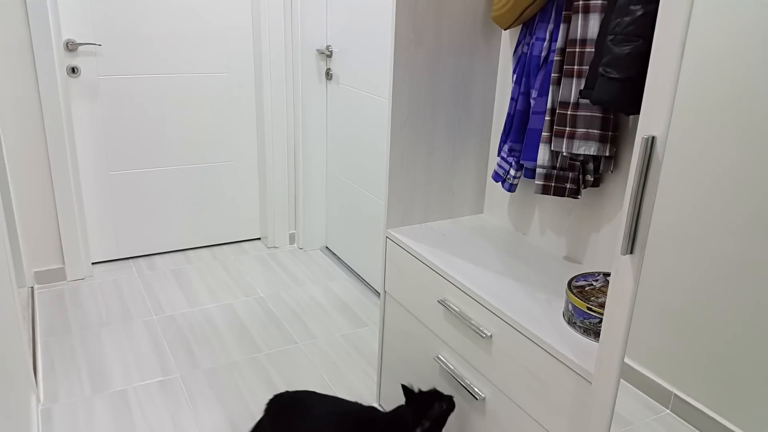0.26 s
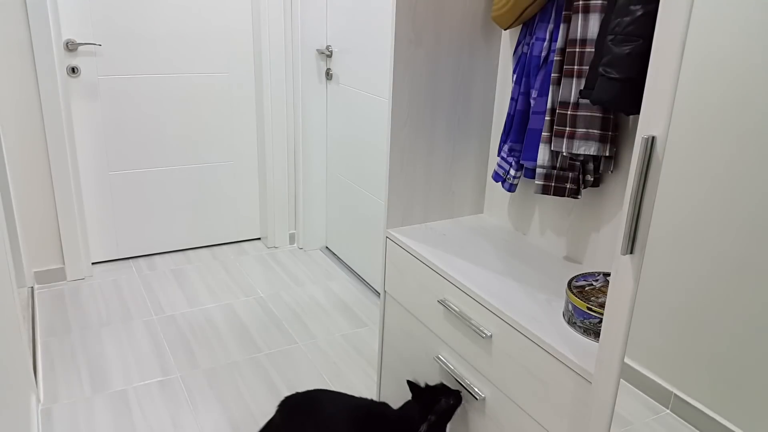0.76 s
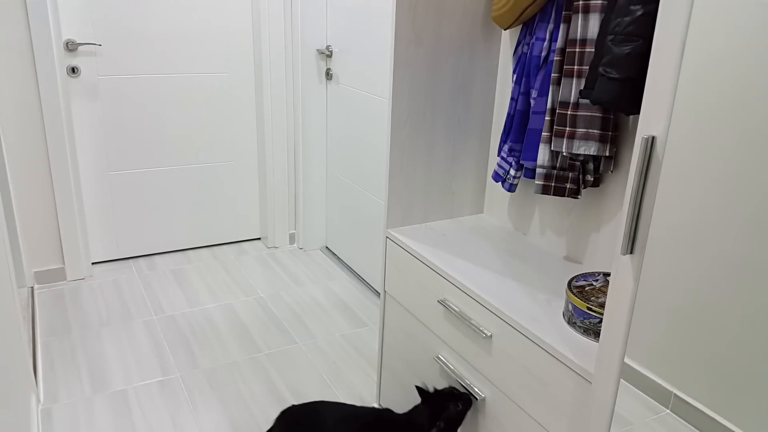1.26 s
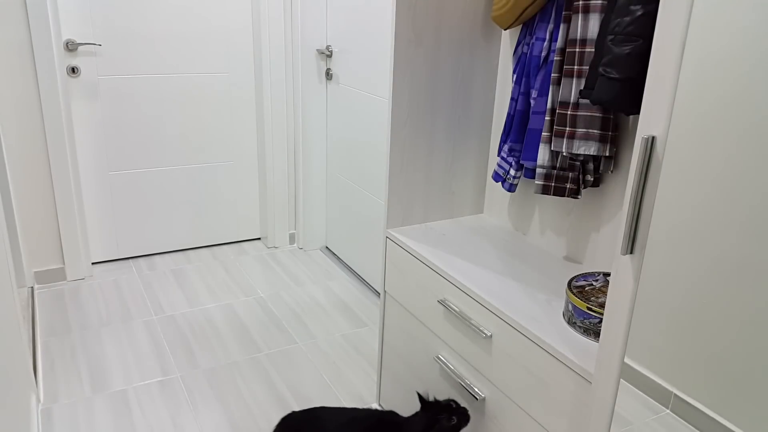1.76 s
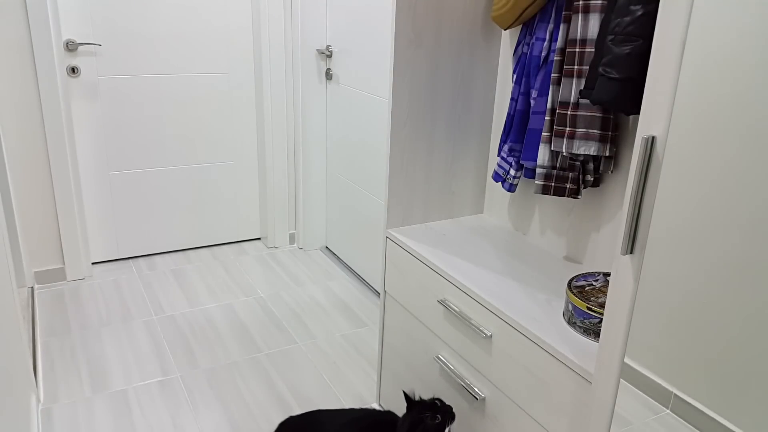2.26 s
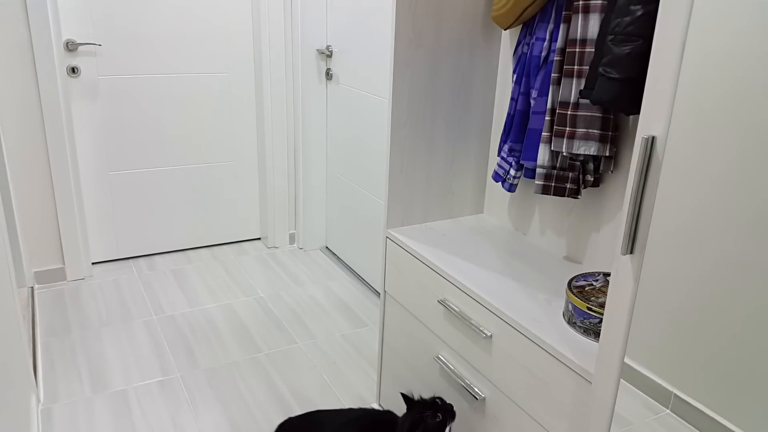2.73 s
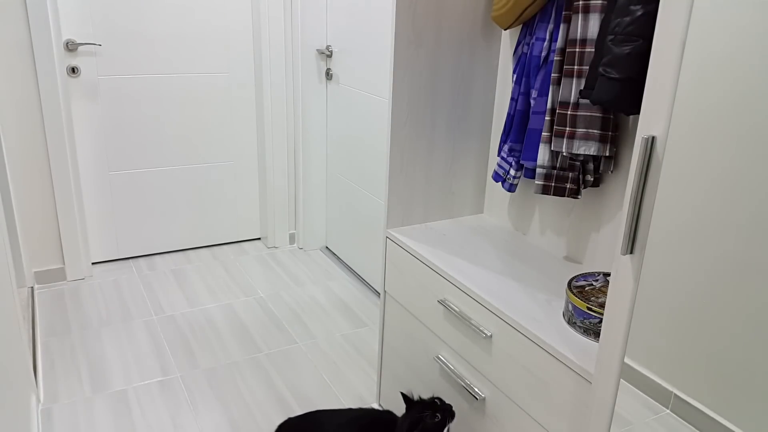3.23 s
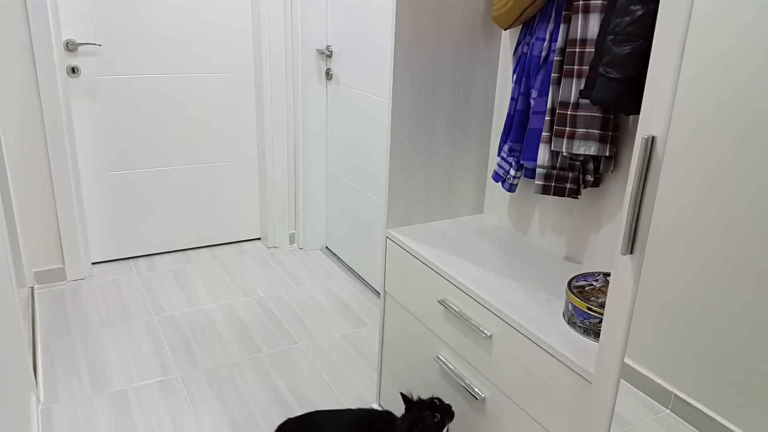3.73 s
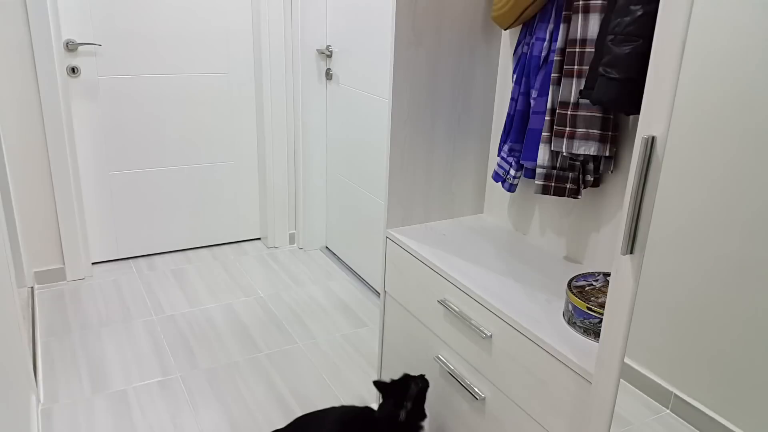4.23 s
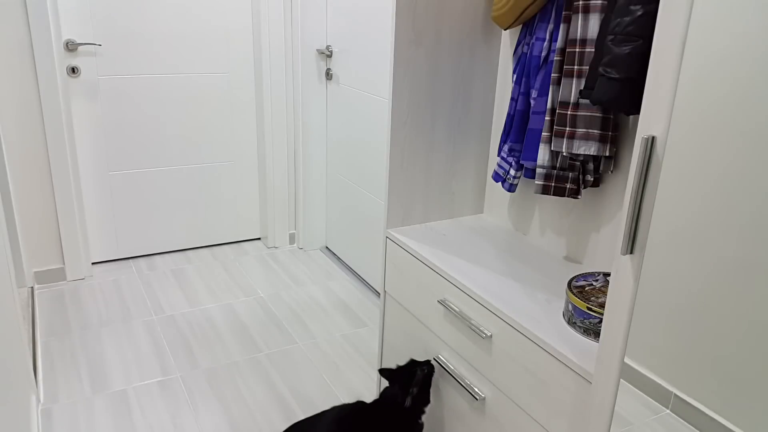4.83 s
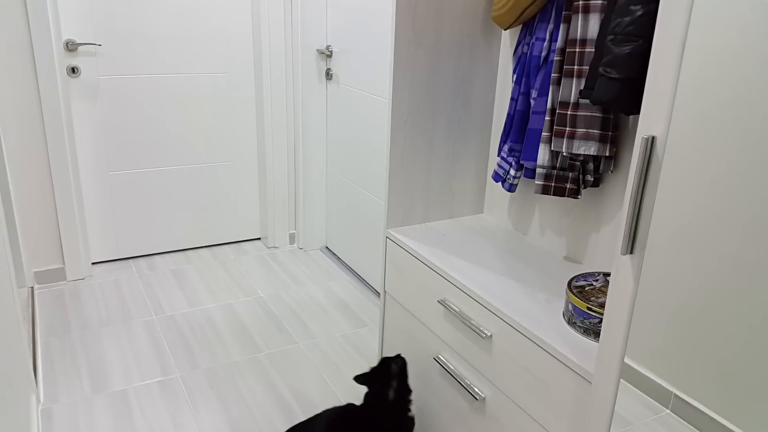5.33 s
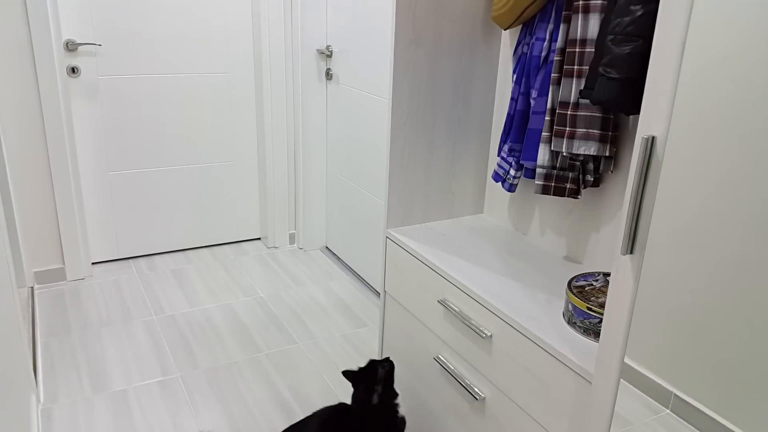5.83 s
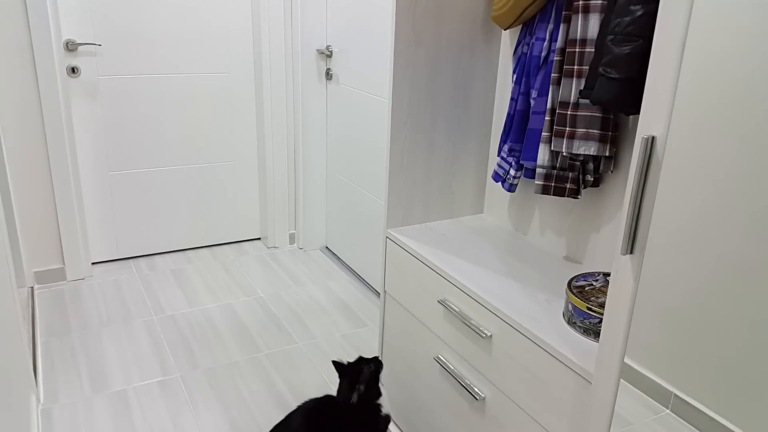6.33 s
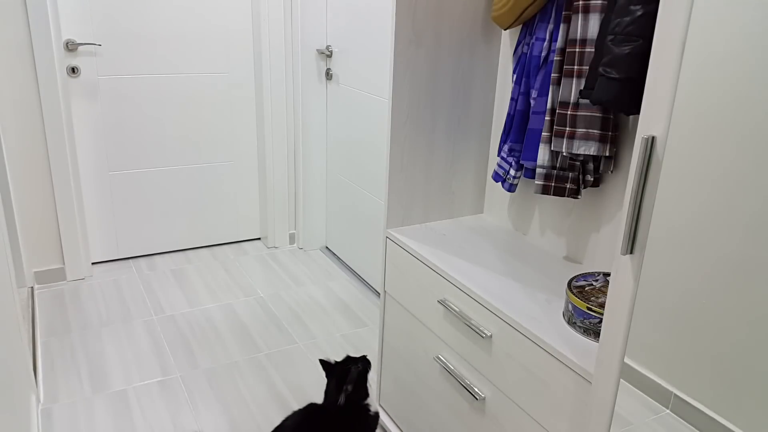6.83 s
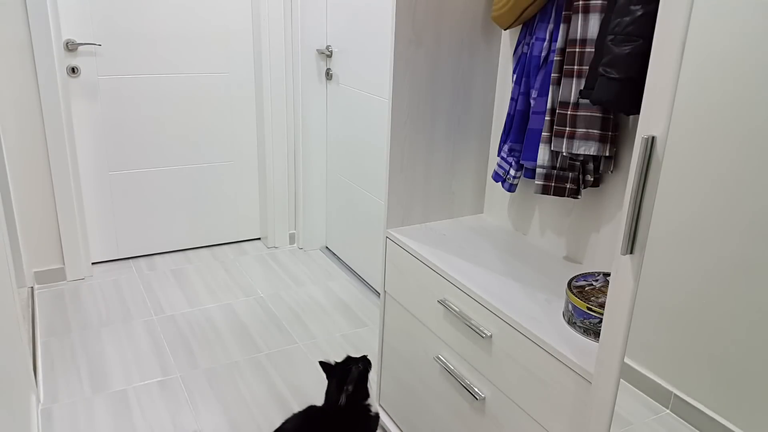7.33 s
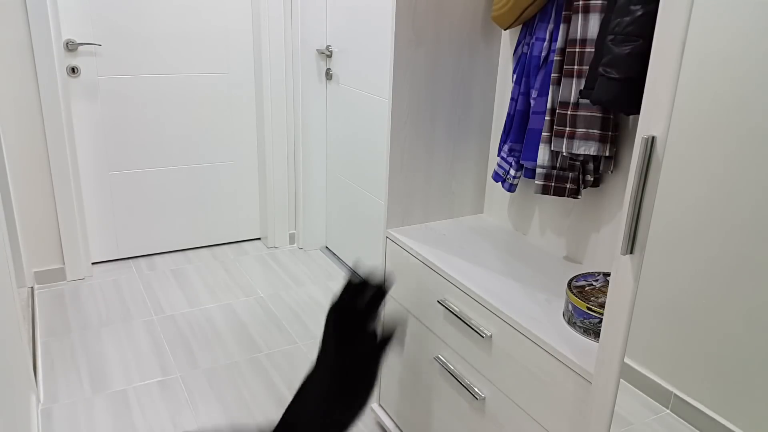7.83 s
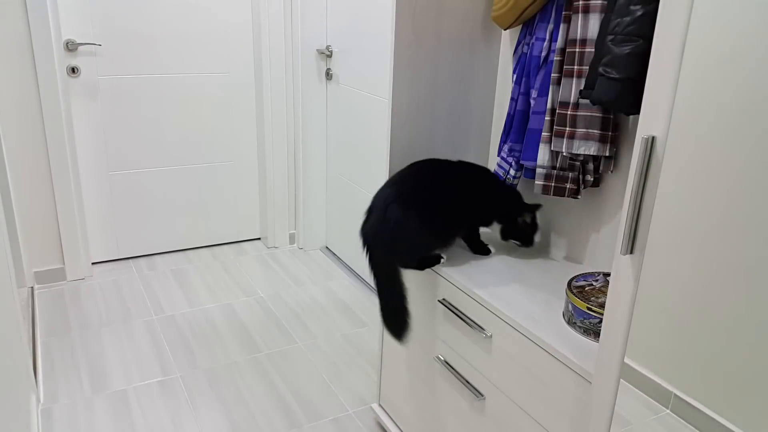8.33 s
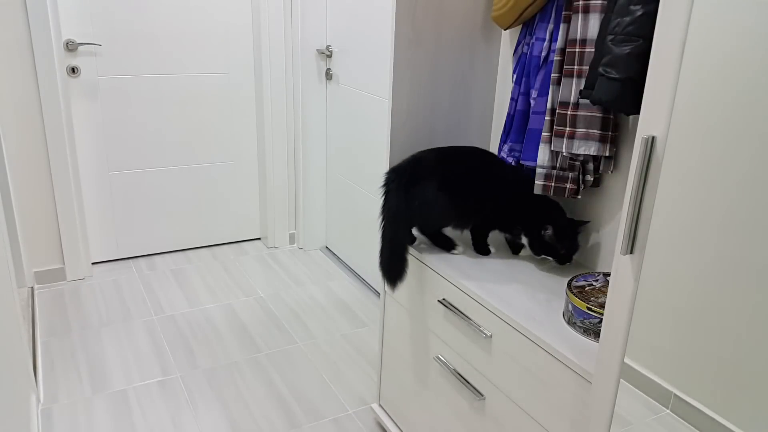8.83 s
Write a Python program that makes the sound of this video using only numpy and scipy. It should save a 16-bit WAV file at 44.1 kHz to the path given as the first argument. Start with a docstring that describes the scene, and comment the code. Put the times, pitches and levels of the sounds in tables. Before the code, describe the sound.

A cat moans long, quavering yowls in a hard, echoing tiled hallway, then thumps softly onto a wooden cabinet and gives one last short call.

```python
"""Cat yowls in a tiled hallway

A cat calls six times and jumps onto a wooden cabinet before the last call. Long yowls start as a quavering,
nearly closed-mouth moan, sink in pitch, open into "ow" and break off in a rasp: summed harmonics and half
harmonics shaped by throat and mouth resonances, with puffs of noise and creaks. Paws boom through panel modes;
ticks are bright noise bursts. Decaying noise makes the hard walls ring over a faint steady hiss.
"""
import sys
import numpy as np
from scipy import signal
from scipy.fft import rfft, irfft
from scipy.io import wavfile

SR = 44100
rng = np.random.default_rng(int(sys.argv[2]) if len(sys.argv) > 2 else 0)


def dump_mix(stems):
    """Bounce the given channels to the path in sys.argv[1] as a 16-bit WAV at rate SR."""
    frames = np.atleast_2d(stems).T  # one column per channel
    limited = np.clip(frames, -1, 1)  # hard clip at full scale
    pcm = np.round(limited * 32767).astype(np.int16)
    wavfile.write(sys.argv[1], SR, pcm)


N = 400428

# calls, resonances with the jaw shut: start_s, end_s, attack_s, start_roughness_0_1, throat_hz (at rest pitch),
# low_overtones_db, lower_mouth_hz, upper_mouth_hz, high_overtones_db
CALLS = [(.06, .62, 0.13, 0.72, 1410, 2, 3920, 4370, -0.5),
         (1.661, 2.959, 0.18, 0.87, 1426, -1.5, 3783, 4280, 0.5),
         (4.172, 5.531, 0.14, 0.85, 1453, 0.5, 3980, 4630, -3.5),
         (5.971, 7.54, 0.098, 0.59, 1507, -0.5, 4276, 4550, -3),
         (7.829, 8.055, 0.13, 0.77, 1500, 6, 4200, 4900, 7),
         (8.69, 9.126, 0.081, 0.71, 1860, 7.5, 3800, 4400, -5)]
# one gesture per call: time_s, pitch_hz, jaw_opening_0_1, lips_drawn_0_1, effort_db
CALL_GESTURES = [
    [(.1, 430.5, 0, 0.2, -4), (.2, 488, 0.02, 0.06, 1), (.36, 478, 0.12, 0, -2), (.48, 467, 0.01, 0, 2),
     (.62, 414.4, 0.07, 0, -5)],
    [(1.68, 395, 0.31, 0, 7), (1.86, 460.8, 0.02, 0, 2.5), (1.98, 466.8, 0.03, 0.26, -1.5),
     (2.34, 441.5, 0.01, 0.08, 0.5), (2.44, 428.6, 0.44, 0.25, -1), (2.53, 417, 0.7, 0.27, 1),
     (2.62, 403.4, 1, 0.58, -1.5), (2.8, 383.4, 0.67, 0.1, 3), (2.88, 386.3, 0.65, 0, -4),
     (2.92, 465, 0.01, 0, 0.5)],
    [(4.2, 439.5, 0.2, 0.9, 1.5), (4.32, 476, 0.04, 0.2, -1), (4.44, 463.6, 0, 0.1, -2),
     (4.7, 511, .15, 0, 2.5), (4.92, 487, .1, 0, 5), (5.04, 469.2, 0.44, .1, 2),
     (5.11, 431.7, 0.81, 0.97, 0.5), (5.19, 434.6, 0.94, 1, 1), (5.3, 418.3, 0.84, 0.53, 2),
     (5.45, 435.1, 0.65, 0.93, -2)],
    [(5.97, 480, 0, 0.13, -4.5), (6.12, 546, 0.14, 0.12, 8), (6.32, 502.4, 0.08, 0.15, 1),
     (6.6, 506.4, 0.03, 0.25, 4), (6.84, 494.4, 0, 0, 3.5), (7.01, 443.4, 0.46, 0.84, -1.5),
     (7.12, 423.8, 0.33, 1, -0.5), (7.23, 410.8, 0.47, 1, -12), (7.35, 431.6, 0, 0.7, 1.5),
     (7.48, 417, 0, 0.74, 1)],
    [(7.83, 501.7, 0, 0.15, -2), (7.9, 457.7, 0, 0.1, -5.5), (7.97, 531.4, 0, 0, -5.5),
     (8.04, 528.3, 0.16, 0, 0.5)],
    [(8.69, 359.8, 0.15, 0.1, 4.5), (8.78, 479.4, 0.68, 0, -5.5), (8.88, 467.5, 0.45, 0, -7.5),
     (8.98, 448.7, 0.05, 0.1, -8.5), (9.08, 449, 0, 0.2, -7)],
]
# relative overtone strength around the throat resonance: multiple_of_throat_hz, level_db
THROAT_COLOUR = [(.6, 3), (.8, -1.5), (1, -4), (1.13, -7), (1.28, -19), (1.45, -32), (2.0, -33), (3, -46)]
# voice cracks into half harmonics as the jaw drops: time_s, half_length_s, period_doubling_0_1
VOICE_CRACKS = [(2.623, 0.21, 0.26), (5.117, 0.062, 0.38), (7.047, 0.046, 0.55), (8.731, .025, 0.45)]
# harder creaks as calls break off: start_s, end_s, level_db, first_resonance_hz, overtones_db
BREAK_CREAKS = [(0.545, 0.608, -53.5, 420, -8), (2.893, 2.963, -50, 534, -10), (5.474, 5.517, -56, 550, -4),
                (7.479, 7.526, -60, 442, 6.5), (7.936, 8.041, -53, 486, -8)]
# upper resonances rung by a creak: pitch_hz, width_hz, level_db
CREAK_RESONANCES = [(1000, 750, -11), (1585, 380, -10.5), (1940, 330, -22), (4200, 2300, -24)]
# paws on the cabinet: time_s, level_db, contact_softness_hz (lowpass cutoff)
PAW_HITS = [(8.033, -62, 400), (8.112, -55, 91), (8.245, -55.5, 131.5), (8.645, -68.5, 400)]
# cabinet panel modes: pitch_hz, level_db, t60_s
CABINET_MODES = [(67.6, -6, 0.38), (92.5, -13, 0.31), (136, -1, 0.25), (163.5, 0, 0.16), (203, -4, 0.2),
                 (297, 3, 0.11)]
# faint high ticks: time_s, level_db
TICK_HITS = [(0.043, -66), (2.114, -60), (4.187, -63), (6.258, -59)]
# hallway decay: band_hz, t60_s
HALL_DECAY = [(100, 0.41), (450, 0.54), (850, 0.53), (1700, 0.46), (4500, 0.67), (10000, 0.4)]
# relative background spectrum: band_hz, density_db (per Hz)
HUSH_SPECTRUM = [(25, -21), (65, -5), (130, -4.5), (200, -3.5), (310, -11), (520, -14.5), (1000, -19.5),
                 (2000, -22), (4800, -27.5), (6700, -21), (8500, -24.5), (10000, -28), (13000, -25.5),
                 (15000, -25)]

# voice levels: (jaw shut, jaw wide open)
FIRST_DB, SECOND_DB, THROAT_DB, MOUTH_DB = (-38.5, -42.5), (-50.5, -23), (-57, -34), (-70.5, -63)
# (lips closed, lips drawn back): all high overtones; then two resonances against the lower mouth one
BARED_DB, UPPER_MOUTH_DB, RIM_DB = (-0.5, 13), (-14.5, 3), (-19.5, -30.5)
# share of their frequency the resonances climb with the jaw, and the upper one with drawn lips
THROAT_RISE, LOWER_RISE, UPPER_RISE, LIPS_RISE = 0.23, 0.14, 0.23, 0.07
# the larynx lifts with pitch and takes the throat resonance along (octaves per octave)
REST_PITCH_HZ, THROAT_FOLLOWS = 480, 0.4
# the open mouth rings most when the second harmonic meets its first resonance
CRY_HZ, CRY_WIDTH_HZ = 855, 99
SECOND_SHARE = 0.51  # share of a call's low_overtones_db that reaches the second harmonic
# a call swells from below and dies away as the folds break up
ATTACK_DEPTH_DB, RELEASE_DEPTH_DB, BREAK_S = 23.5, 20, 0.061
# roughness settles with time and rises again in the break
SETTLE_S, CLEAR_ROUGHNESS, ONSET_ROUGHNESS, BREAK_ROUGHNESS = 0.7, 0.025, 0.3, 0.98
CRACK_ROUGHNESS = 0.28  # roughness per unit of period doubling in a crack
ROUGH_DOUBLING = 0.4  # period doubling per unit of roughness
QUAVER = 0.1  # pitch swing per unit of roughness (share of the pitch)
# soft creak of slack folds at every start; the delay is to the first snap
ONSET_DELAY_S, ONSET_CREAK_S = 0.007, 0.079
ONSET_CREAK_DB, ONSET_CREAK_HZ, ONSET_OVERTONES_DB = -60.5, 500, -7.5
DIRECT_DB, HUSH_DB = -4, -65.5
PORT_GAP_M, SOUND_SPEED_M_PER_S = 0.14, 343
CUTOFF_HZ = 15800


def from_db(db):
    """Decibels to gain."""
    return 10 ** (np.asarray(db) / 20)


def rms_one(x):
    """Scale to unit power."""
    return x / np.sqrt(np.mean(x ** 2) + 1e-20)


def in_time(rows, t):
    """Columns of a curve table at times t."""
    times_s, *columns = np.transpose(rows)
    return [np.interp(t, times_s, column) for column in columns]


def at_hz(points, hz):
    """Read a spectrum on a log-frequency axis."""
    point_hz, value = np.transpose(points)
    return np.interp(np.log(np.maximum(hz, point_hz[0])), np.log(point_hz), value)


def between(ends, amount):
    """Slide from the first value to the second."""
    return ends[0] + (ends[1] - ends[0]) * amount


def band_noise(size, low_hz, high_hz):
    """Unit-power noise between two edges, after the filter has run in."""
    sos = signal.butter(2, [low_hz, min(high_hz, .45 * SR)], "band", fs=SR, output="sos")
    return rms_one(signal.sosfilt(sos, rng.standard_normal(size + SR // 10))[-size:])


def yowl(call, gesture, quaver_hz=44, wander=0.039, jitter=.014, shimmer=0.066, throb=.7,
         rasp=.23, hiss=0.13, fade_s=0.013):
    """Vocal folds quaver and stray with roughness; alternating strong and weak cycles add half harmonics."""
    start_s, end_s = call[:2]
    start = int(start_s * SR)
    t = np.arange(start, min(N, int(end_s * SR))) / SR
    size = len(t)
    folds, levels, tract = controls(call, gesture, t)
    pitch_hz, rough, doubling = folds
    first, second, throat, mouth = levels
    throat_hz, *mouth_shape = tract

    flutter_hz = quaver_hz * (1 + .16 * band_noise(size, 3.36, 26.6))
    flutter = np.sin(2 * np.pi * np.cumsum(flutter_hz) / SR)
    stray = QUAVER * flutter + wander * band_noise(size, 16, 69)
    stray += jitter * rough * band_noise(size, 75, 380)
    phase = 2 * np.pi * np.cumsum(pitch_hz * (1 + rough * stray)) / SR

    order = np.arange(2, 44)[:, None] / 2  # harmonics and half harmonics, 1 to 21.5
    hz = order * pitch_hz
    fold_gain = np.where(order % 1 == 0, 1, np.abs(doubling))
    # the two lowest harmonics have their own levels; a half harmonic lies between
    gains = first * (order == 1) + second * (order == 2)
    gains = gains + .2 * doubling * np.sqrt(first * second) * (order == 1.5)
    throat_colour = from_db(at_hz(THROAT_COLOUR, hz / throat_hz))
    mouth_colour = mouth_gain(hz, *mouth_shape)
    for level, colour in ((throat, throat_colour), (mouth, mouth_colour)):
        colour = colour * fold_gain * (order > 2)
        gains = gains + level * colour / np.linalg.norm(colour, axis=0)
    start_phase = rng.uniform(0, 2 * np.pi, order.shape)
    voice = np.sqrt(2) * np.sum(gains * np.sin(order * phase + start_phase), axis=0)

    # the voice swells as the quaver lifts its pitch
    voice *= 1 + rough * (throb * flutter + shimmer * band_noise(size, 25, 160))
    # turbulence puffs through once a cycle, more when the folds close unevenly
    air = rasp * (rough + doubling) * throat * band_noise(size, 700, 1900)
    air += hiss * mouth * band_noise(size, 4000, 12000)
    voice += air * (1 + np.cos(phase))
    edges = np.clip(np.minimum(t - start_s, end_s - t) / fade_s, 0, 1)
    return np.pad(voice * edges, (start, N - start - size))


def controls(call, gesture, t):
    """Age, effort, jaw and lips set the folds, the strength of the voice and its resonances."""
    start_s, end_s, attack_s, start_rough, throat_hz, low_db, lower_hz, upper_hz, high_db = call
    pitch_hz, jaw, lips, effort_db = in_time(gesture, t)
    starting = np.clip(1 - (t - start_s) / attack_s, 0, 1)
    breaking = np.clip(1 - (end_s - t) / BREAK_S, 0, 1)
    crack = sum(depth * np.exp(-((t - at_s) / length_s) ** 2) for at_s, length_s, depth in VOICE_CRACKS)

    unsettled = start_rough * np.exp(-(t - start_s) / SETTLE_S) * np.clip(1 - jaw, 0, 1)
    rough = CLEAR_ROUGHNESS + unsettled + ONSET_ROUGHNESS * starting + BREAK_ROUGHNESS * breaking
    folds = pitch_hz, rough + CRACK_ROUGHNESS * crack, ROUGH_DOUBLING * rough + crack

    drive_db = effort_db - ATTACK_DEPTH_DB * starting - RELEASE_DEPTH_DB * breaking
    off_resonance_db = 10 * np.log10(1 + (2 * (2 * pitch_hz - CRY_HZ) / CRY_WIDTH_HZ) ** 2)
    parts_db = [between(FIRST_DB, jaw),
                between(SECOND_DB, jaw) + SECOND_SHARE * low_db - jaw * off_resonance_db,
                between(THROAT_DB, jaw) + low_db,
                between(MOUTH_DB, jaw) + between(BARED_DB, lips) + high_db]
    # drawn lips shorten the mouth and lift its upper resonance
    tract = [throat_hz * (1 + THROAT_RISE * jaw) * (pitch_hz / REST_PITCH_HZ) ** THROAT_FOLLOWS,
             lower_hz * (1 + LOWER_RISE * jaw),
             upper_hz * (1 + UPPER_RISE * jaw + LIPS_RISE * lips),
             between(UPPER_MOUTH_DB, lips), between(RIM_DB, lips)]
    return folds, from_db(drive_db + np.array(parts_db)), tract


def mouth_gain(hz, lower_hz, upper_hz, upper_db, rim_db, width_hz=270, rim_hz=7800, rim_width_hz=2000,
               body_hz=3400, body_width_hz=700, body_db=-25):
    """Two narrow sliding resonances plus two broader fixed ones, summed in power."""
    peaks = [(lower_hz, width_hz, 0), (upper_hz, width_hz, upper_db),
             (rim_hz, rim_width_hz, rim_db), (body_hz, body_width_hz, body_db)]
    power = sum((from_db(db) / (1 + (2 * (hz - centre_hz) / peak_width_hz) ** 2)) ** 2
                for centre_hz, peak_width_hz, db in peaks)
    return np.sqrt(power)


def creaks(snaps_per_s=120, uneven=0.38, spread_db=1.5, width_hz=260):
    """Slack folds snap shut at slow, uneven intervals, and each snap rings the throat."""
    out = np.zeros(N)
    onsets = [(start_s + ONSET_DELAY_S, start_s + ONSET_CREAK_S,
               ONSET_CREAK_DB, ONSET_CREAK_HZ, ONSET_OVERTONES_DB) for start_s, *_ in CALLS]
    for start_s, end_s, db, first_hz, overtones_db in onsets + BREAK_CREAKS:
        size = int((end_s - start_s) * SR)
        intervals = np.r_[0, rng.lognormal(0, uneven, 40)]
        at = (np.cumsum(intervals) * SR / snaps_per_s).astype(int)
        strength = from_db(rng.normal(0, spread_db, len(at)))
        snaps = np.zeros(size + SR // 20)  # room to ring out
        snaps[at[at < size]] = strength[at < size]
        modes = [(first_hz, width_hz, 0)]
        modes += [(hz, mode_width_hz, level_db + overtones_db)
                  for hz, mode_width_hz, level_db in CREAK_RESONANCES]
        ring = np.zeros(len(snaps))
        for hz, mode_width_hz, level_db in modes:
            once = resonate(snaps, hz, mode_width_hz)
            ring += from_db(level_db) * rms_one(resonate(once, hz, mode_width_hz))
        first = int(start_s * SR)
        out[first:first + len(ring)] += from_db(db) * ring * np.sqrt(len(ring) / size)
    return out


def resonate(x, hz, width_hz):
    """Two-pole resonance with about unit gain at its peak."""
    r = np.exp(-np.pi * width_hz / SR)
    feedback = [1, -2 * r * np.cos(2 * np.pi * hz / SR), r * r]
    return signal.lfilter([(1 - r * r) / 2, 0, (r * r - 1) / 2], feedback, x)


def paws():
    """Soft pads push on the cabinet and set its panels booming."""
    out = np.zeros(N)
    t = np.arange(SR // 3) / SR
    for at_s, db, soft_hz in PAW_HITS:
        boom = np.zeros(len(t))
        for hz, level_db, t60_s in CABINET_MODES:
            strength = rng.normal(1, 0.18)
            boom += strength * from_db(level_db - 60 * t / t60_s) * np.sin(2 * np.pi * hz * t)
        thump = signal.lfilter(*signal.butter(1, soft_hz, fs=SR), boom)
        at = int(at_s * SR)
        out[at:at + len(t)] += from_db(db) * thump[:N - at]
    return out


def ticks(decay_s=0.0073):
    """Tiny bright snaps: exponentially decaying bursts of high noise."""
    at_s, level_db = np.array(TICK_HITS).T[:, :, None]
    age_s = np.arange(N) / SR - at_s
    bursts = from_db(level_db) * (age_s > 0) * np.exp(-np.clip(age_s / decay_s, 0, 20))
    return bursts.sum(axis=0) * band_noise(N, 6000, 8500)


def diffuse(size, likeness=0.6):
    """Spectra of noise from all sides at two ports: most alike in the bass, nearly unrelated above."""
    hz = np.fft.rfftfreq(size, 1 / SR)
    alike = np.sinc(2 * hz * PORT_GAP_M / SOUND_SPEED_M_PER_S) * np.clip(likeness, 0, 1)
    mid, side = rfft(rng.standard_normal((2, size)))
    return hz, np.sqrt(1 + alike) * mid + np.sqrt(1 - alike) * side * [[1], [-1]]


def hallway(x, early_db=-7.0, tail_db=-2.5, early_t60_s=0.18, gap_s=0.0028):
    """Direct sound, a quick flurry from the near walls, then a tail that dies band by band."""
    t = np.arange(SR) / SR
    hz, near = diffuse(SR)
    flurry = from_db(-60 * t / early_t60_s) * (t > gap_s)
    response = from_db(early_db) * irfft(near, SR) * flurry / np.linalg.norm(flurry) / np.sqrt(2)
    hz, far = diffuse(SR)
    edges_hz = [0, *np.geomspace(300, 9600, 6), SR]
    for low_hz, high_hz in zip(edges_hz, edges_hz[1:]):
        t60_s = at_hz(HALL_DECAY, (low_hz + high_hz) / 2)
        decay = from_db(-60 * t / t60_s) * (t > gap_s)
        band = irfft(far * ((hz >= low_hz) & (hz < high_hz)), SR)
        response += from_db(tail_db) * band * decay / np.linalg.norm(decay) / np.sqrt(2)
    # direct sound reaches the right port 4 samples sooner
    response[[0, 1], [4, 0]] += from_db(DIRECT_DB)
    return signal.fftconvolve(x[None], response, axes=1)[:, :N]


def hush(left_db=2.04):
    """Low murmur of the house and microphone hiss, as steady shaped noise."""
    hz, field = diffuse(N)
    noise = rms_one(irfft(field * from_db(at_hz(HUSH_SPECTRUM, hz)), N))
    return from_db(HUSH_DB) * from_db([[left_db], [-left_db]]) * noise


def scene(cat_db=0.0, hush_db=0.0, left_db=0.38, chest_cut_hz=385):
    """Cat and cabinet in the hallway; so small a mouth radiates little bass."""
    cat = from_db(cat_db) * sum(yowl(call, gesture) for call, gesture in zip(CALLS, CALL_GESTURES))
    cat = signal.sosfilt(signal.butter(4, chest_cut_hz, "high", fs=SR, output="sos"), cat)
    room = hallway(cat + creaks() + paws() + ticks())
    return room * from_db([[left_db], [-left_db]]) + from_db(hush_db) * hush()


def record(dry):
    """Cut the top steeply with an elliptic lowpass."""
    return signal.sosfilt(signal.ellip(12, .1, 80, CUTOFF_HZ, fs=SR, output="sos"), dry)


dry = scene()
out = record(dry)
dump_mix(out)
```